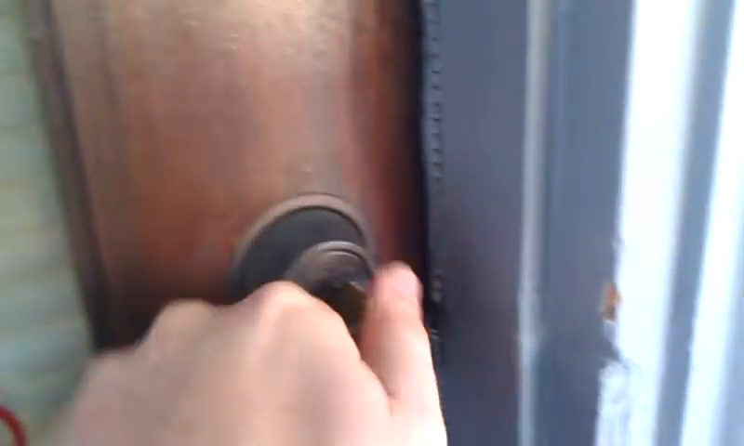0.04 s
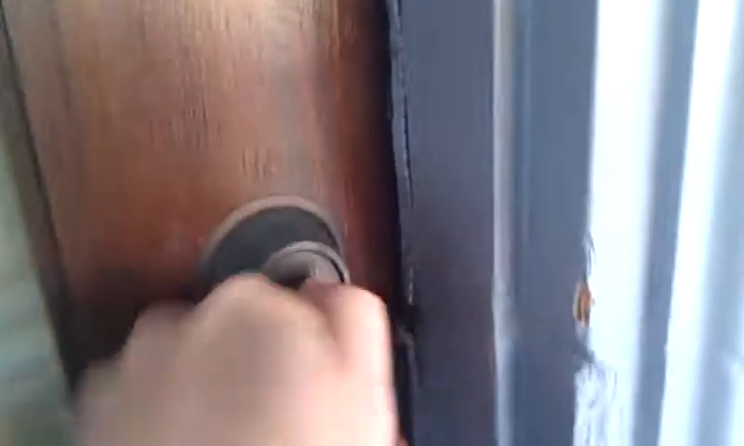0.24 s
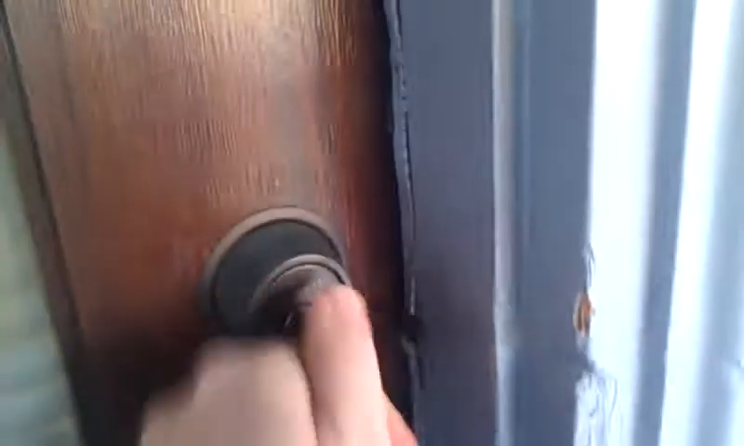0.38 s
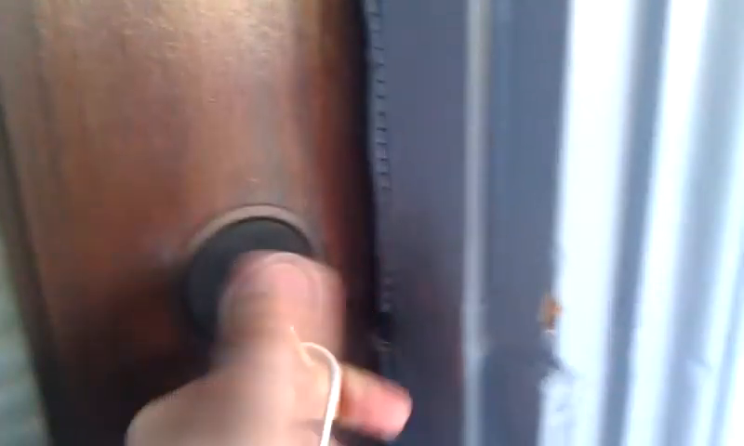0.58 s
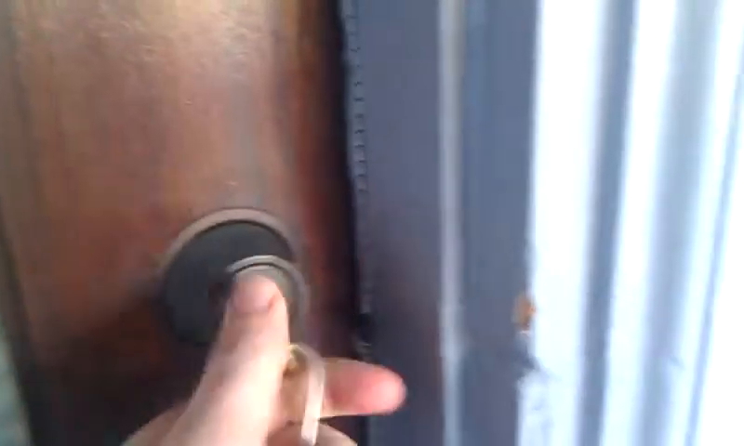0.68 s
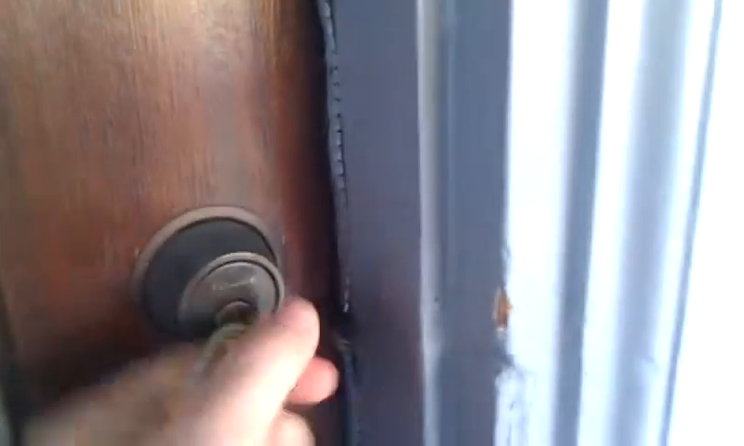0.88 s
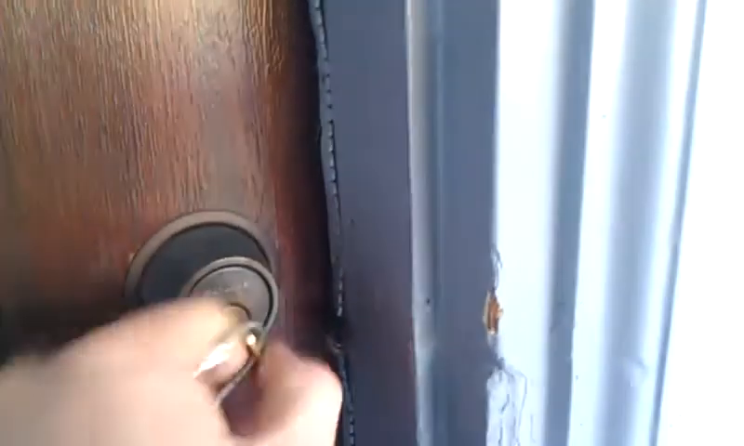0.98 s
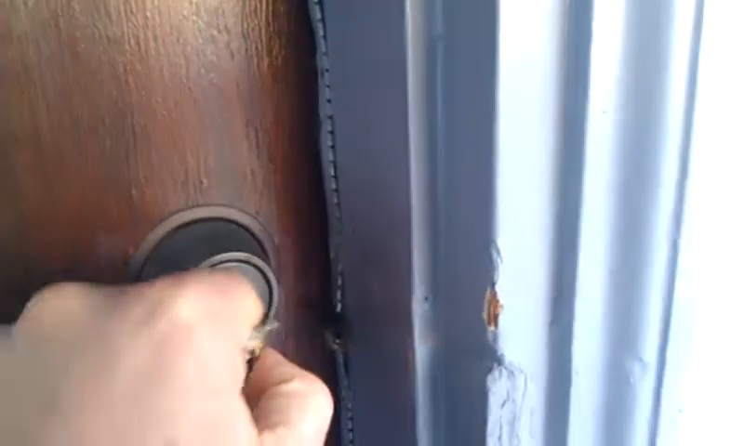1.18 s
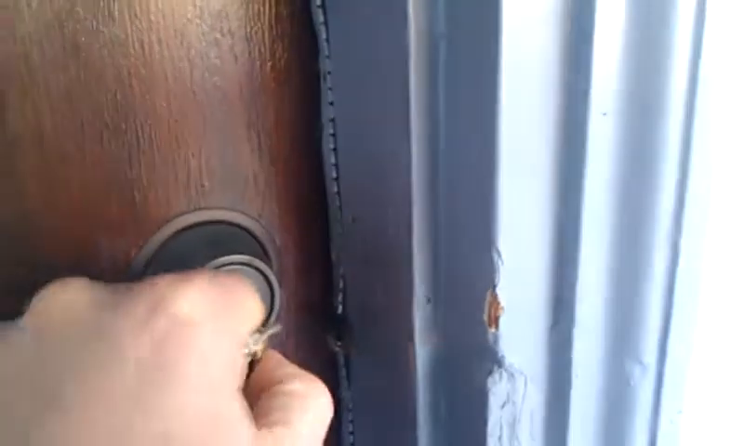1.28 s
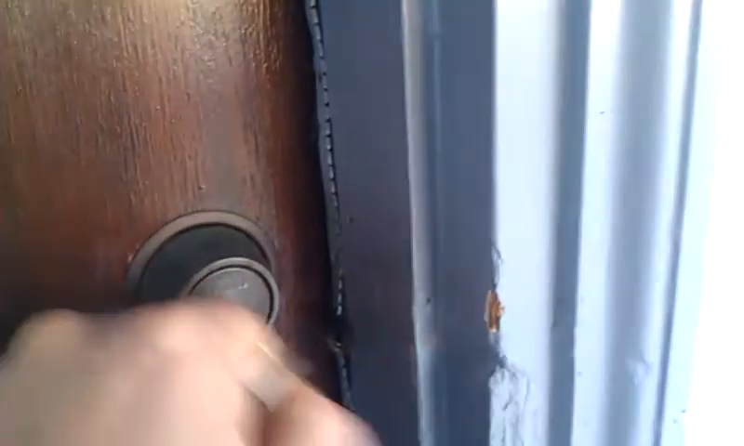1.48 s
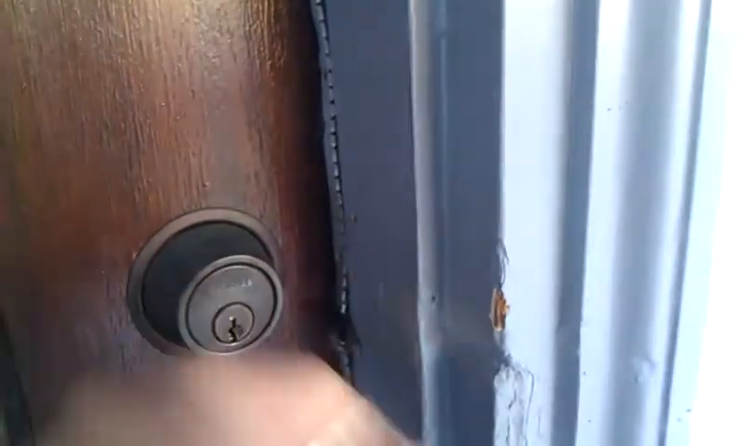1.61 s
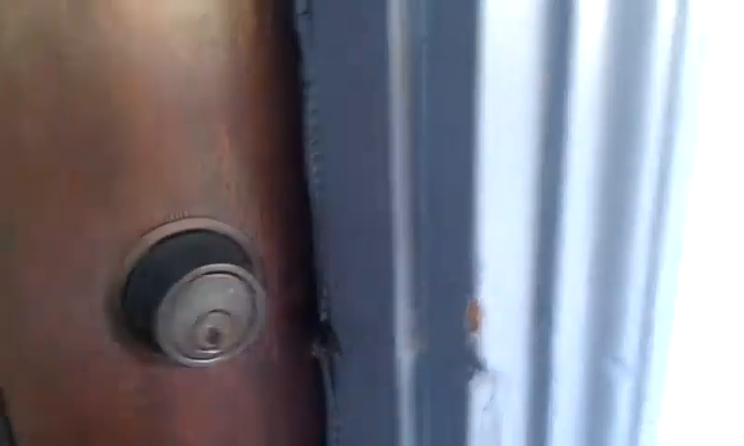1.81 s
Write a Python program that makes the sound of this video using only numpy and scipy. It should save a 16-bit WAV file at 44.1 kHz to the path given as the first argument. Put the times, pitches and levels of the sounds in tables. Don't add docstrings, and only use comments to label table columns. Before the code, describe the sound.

Deadbolt lock clacking sharply shut, key fiddling back and scraping out with a faint jingle

```python
import sys
import numpy as np
from scipy import signal
from scipy.io import wavfile

SR = 44100
rng = np.random.default_rng(int(sys.argv[2]) if len(sys.argv) > 2 else 0)


def materialize(psi):
    bounded = np.clip(np.atleast_2d(psi).T, -1, 1)
    quanta = np.round(bounded * 32767).astype(np.int16)
    wavfile.write(sys.argv[1], SR, quanta)


def volts_from_decibels(level):
    exponent = np.asarray(level, float) / 20
    return 10 ** exponent


N = 81585

RISE_S = 0.00024
RUBS_PER_S = 7700

# frequency in Hz, level in dB.
CYLINDER_MODES = [(3100, -8), (3800, -6), (4550, -6), (5200, 0.5), (5700, 3.5), (6100, 2), (6600, 2),
                  (7300, -7), (8400, -44.5)]
# frequency in Hz, level in dB.
BLADE_MODES = [(9800, -5), (11000, -5.5), (11800, -1), (13200, 3.5), (14300, 6.5), (15200, 11), (15700, -5)]


def rms_one(x):
    return x / np.sqrt(np.mean(x ** 2) + 1e-20)


def drift(rate_hz):
    pole = np.exp(-2 * np.pi * rate_hz * 40 / SR)
    settle = 2000
    noise = rng.standard_normal(N // 40 + 2 + settle)
    slow = signal.lfilter([1], [1, -2 * pole, pole * pole], noise)[settle:]
    return np.interp(np.arange(N) / 40, np.arange(len(slow)), rms_one(slow))


def ring(clicks, hz, t60):
    radius = volts_from_decibels(-60 / (t60 * SR))
    angle = 2 * np.pi * hz / SR
    feedback = [1, -2 * radius * np.cos(angle), radius * radius]
    return signal.lfilter([0, np.sin(angle)], feedback, clicks + 1e-18)


def grains(rate, spread_db, size):
    chance, luck, side = rng.random((3, size))
    strength = volts_from_decibels(-spread_db * np.log(luck + 0.01))
    return (chance < rate / SR) * strength * np.sign(side - 0.5)


def coloured(spectrum, patchy_db, rate_hz):
    white = rng.standard_normal((2, N))
    hz, db = np.transpose(spectrum)
    edges = np.geomspace(20, 15700, 21)
    out = 0
    for k, (low, high) in enumerate(zip(edges, edges[1:])):
        sos = signal.butter(2, [low, high], "band", fs=SR, output="sos")
        band = signal.sosfilt(sos, white[k % 2])
        level = np.interp(np.log(low * high) / 2, np.log(hz), db, left=-60, right=-60)
        out = out + volts_from_decibels(level + patchy_db * drift(rate_hz)) * band
    return rms_one(out)


def hall_air():
    # frequency in Hz, level in dB per Hz.
    air_spectrum = [(120, -72), (200, 0), (476, -8), (1610, -6.5), (3130, -15.5), (6430, -29.5),
                    (9310, -52), (15000, -17), (16500, -44)]
    return volts_from_decibels(-63) * coloured(air_spectrum, patchy_db=3.5, rate_hz=10.0)


def hall_echo(x):
    t60, wall_cut_hz = 0.29, 3800
    dull = np.exp(-2 * np.pi * wall_cut_hz / SR)
    lags = (rng.uniform(0.004, 0.021, 10) * SR).astype(int)
    out = np.zeros(N)
    for k, lag in enumerate(lags):
        loop = x.copy()
        gain = volts_from_decibels(-60 * lag / SR / t60)
        state = [0.0]
        for i in range(lag, N, lag):
            back, state = signal.lfilter([gain * (1 - dull)], [1, -dull], loop[i - lag:i], zi=state)
            loop[i:i + lag] += back[:N - i]
        out += (loop - x) * (-1) ** k
    return out


def hand():
    # time in seconds, shudder in dB, rubbing in dB.
    hand_levels = [(0, -58, -65), (.13, -68, -65), (0.257, -48.5, -47), (.39, -55.5, -60),
                   (0.491, -62, -67), (0.513, -52.5, -63.5), (.62, -55, -68.5), (.73, -64, -62.5),
                   (.92, -56.5, -63), (1.001, -59, -62), (1.03, -56.5, -63), (1.31, -64, -75.5),
                   (1.5, -61.5, -64), (1.582, -44, -53), (1.68, -53, -59), (1.75, -46.5, -65.5),
                   (1.81, -54, -53.5), (1.85, -45, -54)]
    # frequency in Hz, level in dB per Hz.
    shudder_spectrum = [(12, -36), (20, -10), (65, -3), (145, -6.5), (184, -12), (552, -28.5), (700, -17.5),
                        (910, -68), (1540, -120)]
    blade_db = -13.5
    s, *columns = np.transpose(hand_levels)
    shudder_gain, rub_gain = [volts_from_decibels(np.interp(np.arange(N) / SR, s, db)) for db in columns]

    rubbing = 0
    for modes, part_db in ((CYLINDER_MODES, 0), (BLADE_MODES, blade_db)):
        for hz, db in modes:
            rubbing = rubbing + volts_from_decibels(db + part_db) * ring(grains(RUBS_PER_S, 1.5, N), hz, 19.7 / hz)
    rubbing = rub_gain * volts_from_decibels(-1.5 + 2.83 * drift(45)) * rms_one(rubbing)

    shudder = coloured(shudder_spectrum, patchy_db=2.5, rate_hz=10.0)
    return shudder_gain * volts_from_decibels(1.05 * drift(10)) * shudder + rubbing


def door():
    # start in seconds, level in dB, resonance in Hz, decay to -60 dB in seconds.
    shifts = [
        (.0, -56.5, 990, 0.35),
        (0.503, -38, 4570, 0.041),
        (.512, -48, 318, 0.21),
        (1.014, -41.5, 4560, 0.039),
        (1.022, -49.5, 322, 0.24),
        (1.343, -56, 1050, 0.079),
        (1.366, -53.5, 1020, 0.4),
        (1.577, -37.5, 229, 0.21),
        (1.716, -39, 216, 0.096),
        (1.744, -45, 200, 0.1),
    ]
    out, t = np.zeros(N + SR), np.arange(SR // 2) / SR
    for s, db, hz, decay in shifts:
        t60 = (4 + hz / 250) / hz
        grit = rms_one(ring(grains(RUBS_PER_S, 2.5, len(t)), hz, t60))
        fade = volts_from_decibels(db - 60 * t / decay) * np.minimum(t / 0.004, 1)
        start = int(s * SR)
        out[start:start + len(t)] += fade * grit
    return out[:N]


def jingle():
    # time in seconds, then the level in dB of each free key mode in turn.
    touches = [
        (1.752, -72, -79, -76, -61),
        (1.766, -67, -78, -58, -64),
        (1.777, -54, -70, -52, -57),
        (1.802, -49.5, -56, -46, -58),
        (1.845, -58, -49, -35, -26),
    ]
    # frequency in Hz, ringing to -60 dB in seconds.
    free_key_modes = [(6815, .25), (7530, 0.16), (11160, 0.21), (14920, 0.21)]
    brush_s, brush_db = 1.826, -12
    rows, t = np.array(touches), np.arange(N) / SR
    touch_t = t[:40]
    out = 0
    for k, (hz, t60) in enumerate(free_key_modes):
        clicks = np.zeros(N)
        clicks[(rows[:, 0] * SR).astype(int)] = volts_from_decibels(rows[:, k + 1])
        push = np.cos(2 * np.pi * hz * touch_t) / len(touch_t) * 2
        soft = np.convolve(clicks, push)[:N]
        out = out + volts_from_decibels(3.0 * drift(44)) * ring(soft, hz, t60)
    damped = (t > brush_s) * (t < rows[-1, 0])
    return out * volts_from_decibels(brush_db * damped)


def ticks():
    # time in seconds, peak in dB, pitch in Hz, ringing to -60 dB in seconds.
    blows = [(0.2252, -21, 5700, 0.0092), (0.2773, -23.5, 6700, 0.013), (0.7342, -36.5, 6200, 0.0078),
             (0.7462, -39, 5830, 0.0089), (0.7452, -25.5, 6320, 0.0047), (.7568, -43.5, 10850, 0.011),
             (1.3703, -52, 5750, 0.0093), (1.5078, -25, 6710, 0.012), (1.5205, -26, 13200, 0.0062),
             (1.5221, -31, 5570, .008), (1.5316, -27, 7050, .008), (1.5316, -30, 15000, .007),
             (1.5398, -26, 6600, 0.015), (1.5400, -25, 11600, .008), (1.551, -38, 6600, 0.0054),
             (1.558, -16, 11920, 0.0043), (1.5588, -18, 13100, 0.0068), (1.5581, -16, 15400, 0.0075),
             (1.56, -23.5, 6680, 0.0089), (1.5638, -30, 6500, 0.0049), (1.5692, -27.5, 4850, 0.0093)]
    split = 0.027
    out, t = np.zeros(N + 900), np.arange(900) / SR
    for s, db, hz, t60 in blows:
        lower = np.sin(2 * np.pi * hz * (1 - split) * t)
        upper = np.sin(2 * np.pi * hz * (1 + split) * t)
        start = int(s * SR)
        out[start:start + len(t)] += volts_from_decibels(db - 60 * t / t60) * (1 - np.exp(-t / RISE_S)) * (lower + upper)
    return out[:N]


def bolt():
    # time in seconds, level in dB.
    slam_blows = [
        (.2316, -15),
        (.2322, -10),
        (.2328, -8),
        (.2343, -10),
    ]
    # frequency in Hz, level in dB, ringing to -60 dB in seconds.
    bolt_modes = [(5226, -10.5, .014), (5296, -1.5, .015), (5620, -5.5, 0.02), (6020, -10, 0.017),
                  (6560, -16.5, .015), (7350, -19.5, 0.037), (3080, -14, 0.072), (2500, -14.5, .025),
                  (1847, -19.5, .03), (1200, -16, 0.046), (990, -26, .04), (607, -27, .04)]
    clicks = np.zeros(N)
    for s, db in slam_blows:
        clicks[int(s * SR)] = volts_from_decibels(db - 6)
    return sum(volts_from_decibels(db) * ring(clicks, hz, t60) for hz, db, t60 in bolt_modes)


def lock():
    # time in seconds, peak in dB, key blade in dB, door panel in dB, rattle decay in seconds.
    throw = [(0.1365, -35.5, -9.5, -7.5, 0.016), (0.2013, -39, -18, -4, 0.089),
             (0.2222, -34.5, -16.5, -7.5, 0.04), (0.225, -22.5, -13, -18, 0.03),
             (.2285, -17.5, -11.5, -20.5, 0.046), (0.2308, -15, -14, -24, 0.047),
             (.2345, -22.5, -14.5, -6.5, 0.028), (.2390, -28.5, -16, -2.5, 0.087),
             (0.2766, -25, -17.5, -14, 0.038), (0.289, -34, -11.5, -6, 0.0075),
             (.5035, -35, -25.5, -5.5, 0.015)]
    turn_back = [(0.6522, -47, -15.5, -5.5, 0.031), (0.6824, -62, 6, -6, 0.014),
                 (.7335, -39, -13, -19, 0.022), (0.7431, -26.5, -15.5, -31, 0.0091),
                 (0.7468, -30, -31, -28, 0.032), (0.749, -35.5, -17, -5.5, 0.063),
                 (0.756, -44, 0, -6, 0.0075), (0.8286, -45.5, -16, -1, 0.038), (0.886, -61, -1, 3, 0.066),
                 (1.0152, -45, -40, 1, 0.024), (1.111, -43.5, -21, -12, 0.02),
                 (1.1799, -40, -10, -36, 0.028), (1.2193, -46, -13, -27, 0.018),
                 (1.248, -44, -29, -19, 0.029), (1.2843, -45.5, -14.5, -31.5, 0.027),
                 (1.367, -49.5, -22.5, -5, 0.044), (1.386, -41.5, -20, -18, 0.0088),
                 (1.4136, -33, -19, -8, 0.017), (1.419, -38, -19, -8, 0.033),
                 (1.4406, -43.5, -11, -7.5, 0.036)]
    pull = [(1.484, -50, -11, -15, 0.043), (1.4997, -41, -6, -14, 0.18), (1.507, -30, -6, -13, 0.057),
            (1.5148, -34, -1, -11, 0.059), (1.5209, -24.5, -11, -19, 0.047), (1.5313, -26.5, 1, -26, 0.034),
            (1.5391, -25, -9, -14.5, 0.091), (1.55, -33, -7, -6, 0.028), (1.5591, -20.5, 6, -12, 0.018),
            (1.562, -31.5, -12, -9, 0.029), (1.5680, -25, -13, -5.5, 0.047),
            (1.6603, -46.5, -18, -21, 0.044), (1.6922, -40.5, -19.5, -8, 0.11),
            (1.7975, -52.5, 12, -4.5, 0.037), (1.8283, -44, -21, -1.5, 0.038),
            (1.8448, -34.5, 0.5, -29, 0.017)]
    act_leans = [-1.5, 3.7, 5.5]
    # frequency in Hz, level in dB.
    panel_modes = [(600, -12.5), (720, -2), (920, 1), (1180, 3.5), (1350, 0.5), (1620, 3.5), (1850, 3),
                   (2250, 5), (2650, -14)]
    # level in dB, cycles of ringing to -60 dB.
    body_settings = [(-11, 45), (-5, 50), (-12, 18)]
    knocks_per_s, knock_spread_db = 7000, 3.0
    mode_spread_db, detune, own_share = 2.2, 0.02, 0.7
    head_db, head_s, first_db = 1.5, 0.00075, 10

    span = 6000
    out, t = np.zeros(N + span), np.arange(span) / SR
    bodies = (CYLINDER_MODES, BLADE_MODES, panel_modes)
    contacts = [(*row, lean) for rows, lean in zip((throw, turn_back, pull), act_leans) for row in rows]
    for s, db, blade_db, panel_db, decay, lean_db in contacts:
        fade_db = head_db * np.exp(-t / head_s) - 60 * t / np.clip(decay, 0.004, 0.15)
        shape = (1 - np.exp(-t / RISE_S)) * volts_from_decibels(fade_db) / 3
        shared, *own = [grains(knocks_per_s, knock_spread_db, span) for _ in range(4)]
        shared[8] = volts_from_decibels(first_db)
        start = int(s * SR)
        for b, (modes, (body_db, cycles), part_db) in enumerate(zip(bodies, body_settings, (0, blade_db, panel_db))):
            for k, (hz, mode_db) in enumerate(modes):
                strength_luck, pitch_luck = rng.standard_normal(2)
                knocks = shape * ((1 - own_share) * shared + own_share * own[k % 3])
                knocks = knocks * np.sqrt(np.sum(shape ** 2) / np.sum(knocks ** 2)) / 2
                level = db + body_db + part_db + mode_db + mode_spread_db * strength_luck
                if b == 0:
                    level += lean_db * np.log2(hz / 6000)
                out[start:start + span] += volts_from_decibels(level) * ring(knocks, hz * (1 + detune * pitch_luck), cycles / hz)
    return out[:N]


def scene():
    slam = bolt()
    above_bass = signal.butter(4, 540, "high", fs=SR, output="sos")
    metal = signal.sosfilt(above_bass, lock() + ticks() + slam)
    echo = volts_from_decibels(-16.5) * hall_echo(metal - 0.58 * slam)
    return (metal + jingle() + echo + hand() + door() + hall_air())[None]


def band_limit(x):
    return signal.sosfilt(signal.butter(12, 16850, fs=SR, output="sos"), x)


def record(dry):
    # centre in seconds, length in seconds, depth in dB.
    ducks = [
        (.2190, .0065, -28),
        (1.4965, .005, -18),
    ]
    t = np.arange(N) / SR
    duck = volts_from_decibels(sum(db * np.exp(-((t - s) / (length / 2)) ** 4) for s, length, db in ducks))
    low = signal.sosfiltfilt(signal.butter(2, 300, fs=SR, output="sos"), dry)
    top_cut = signal.cheby2(10, 45, 16400, fs=SR, output="sos")
    mix = signal.sosfilt(top_cut, low + duck * (dry - low))
    return band_limit(mix)


dry = scene()
out = record(dry)
materialize(out)
```